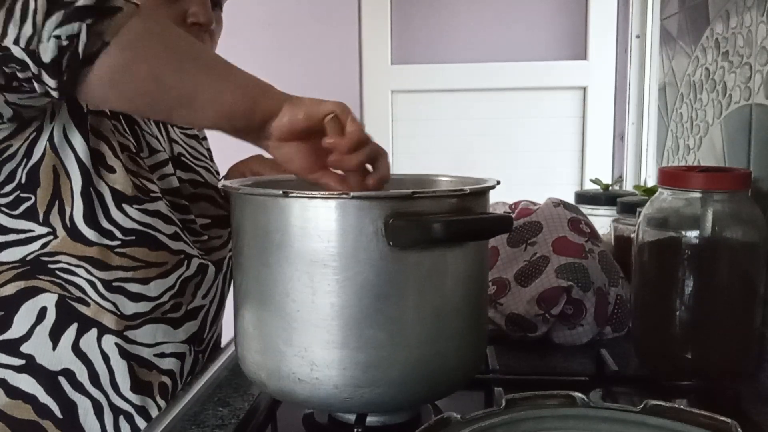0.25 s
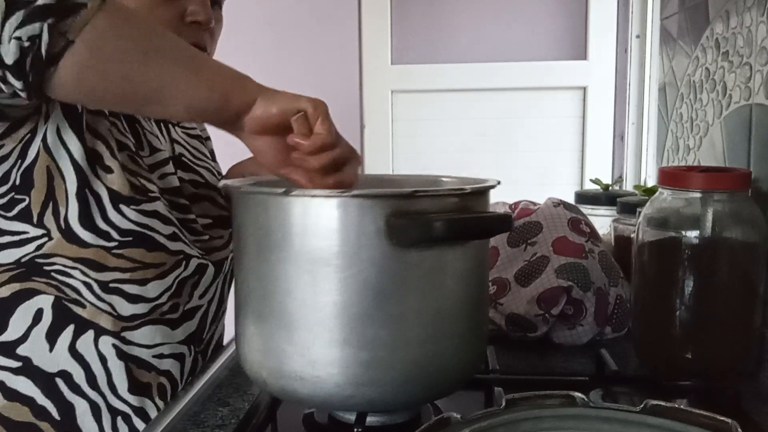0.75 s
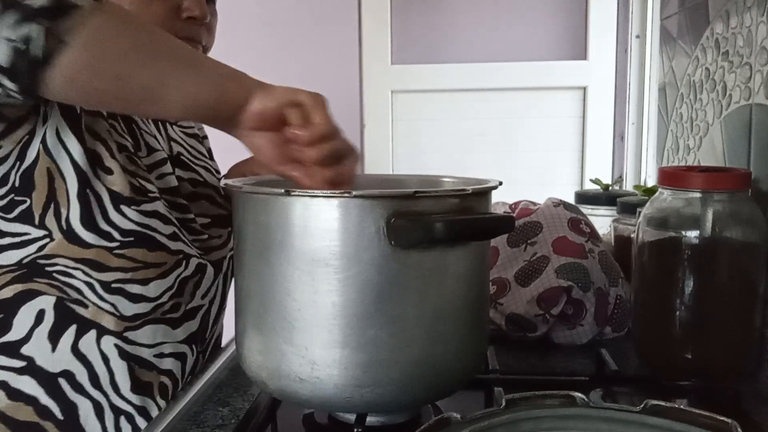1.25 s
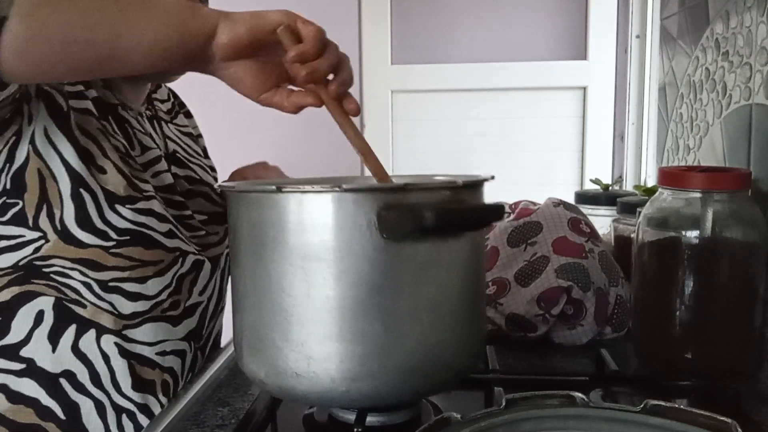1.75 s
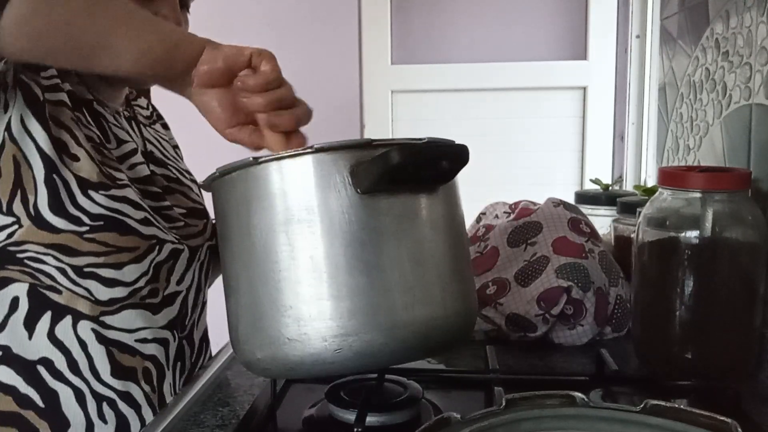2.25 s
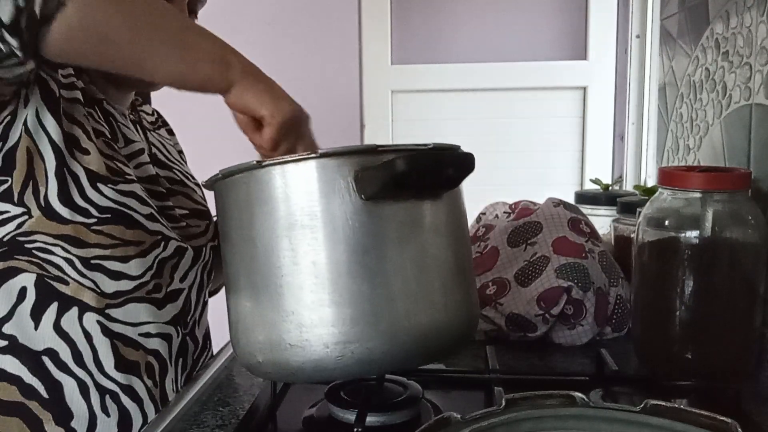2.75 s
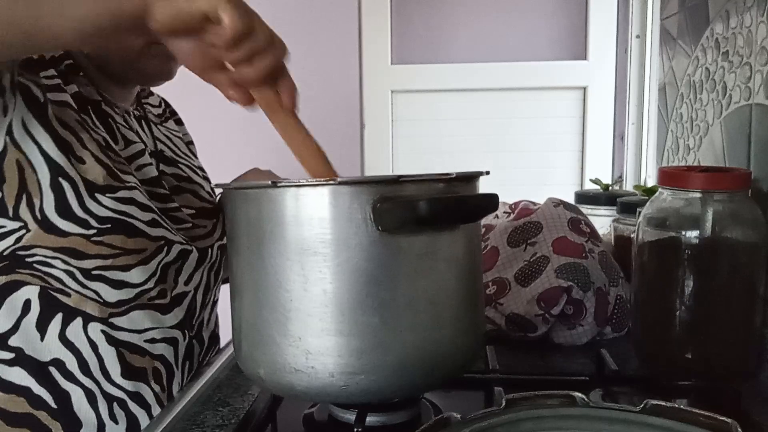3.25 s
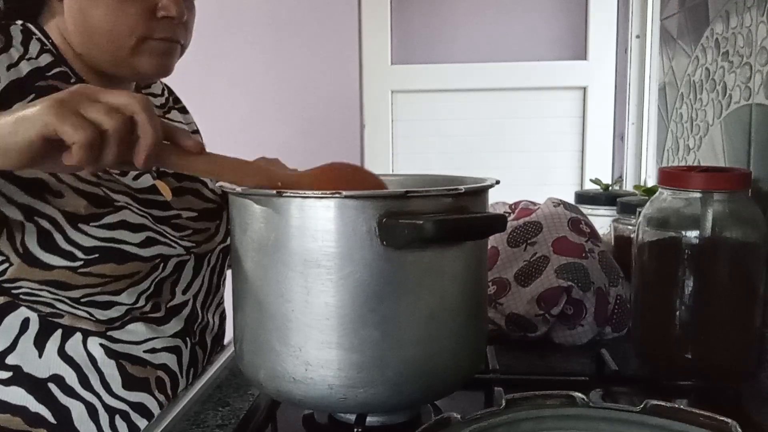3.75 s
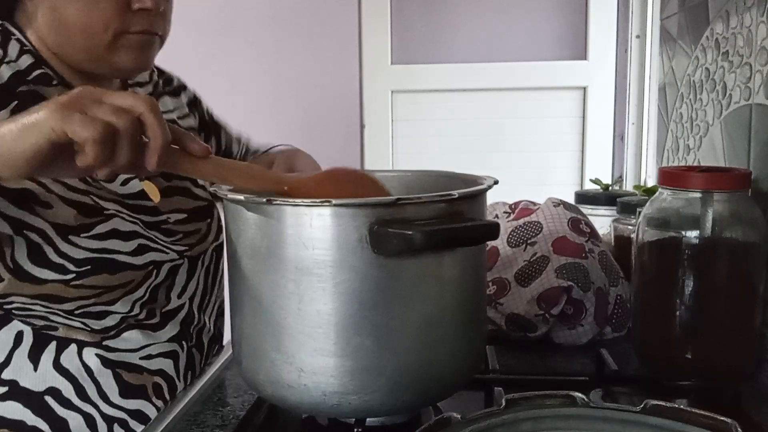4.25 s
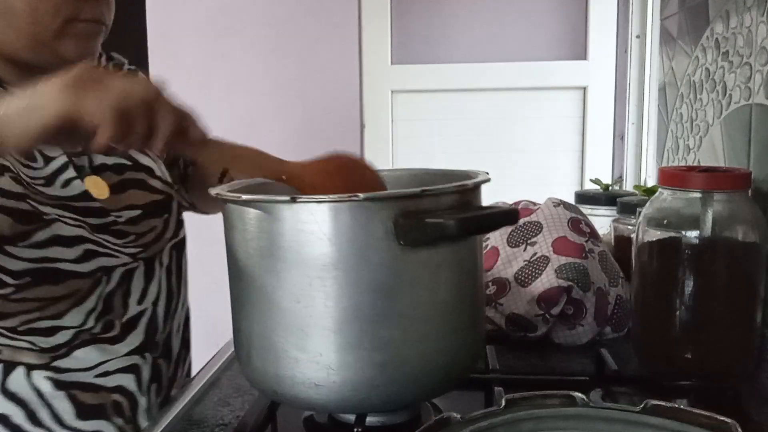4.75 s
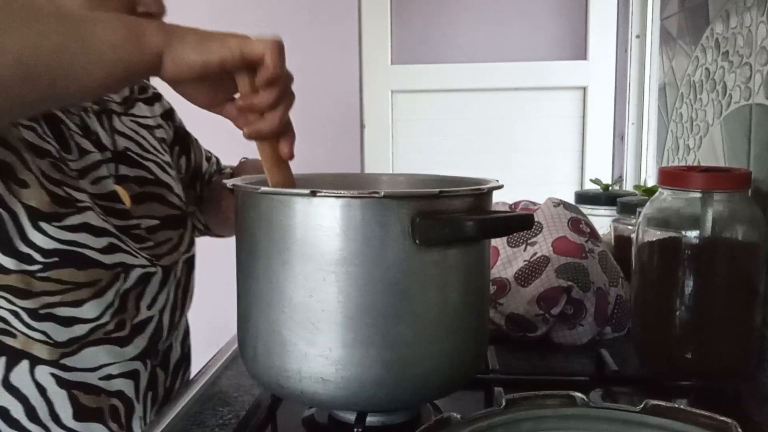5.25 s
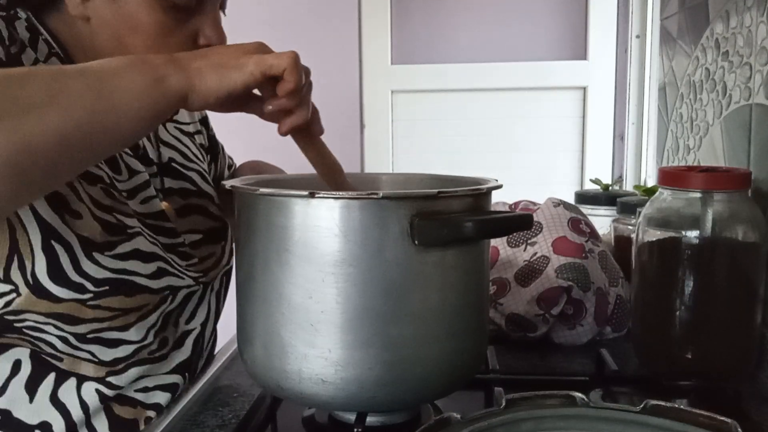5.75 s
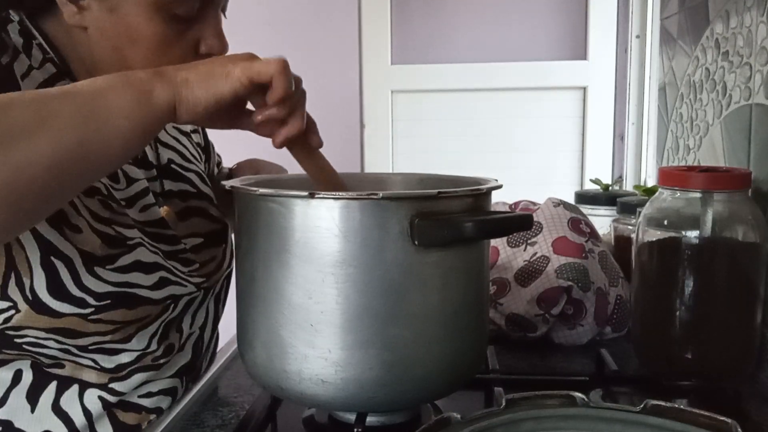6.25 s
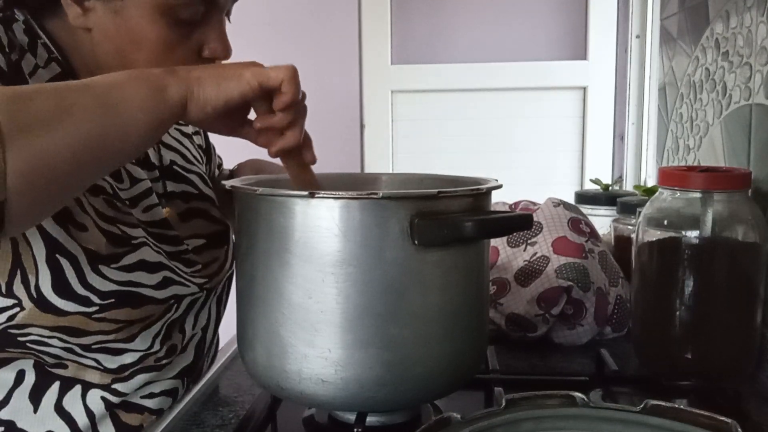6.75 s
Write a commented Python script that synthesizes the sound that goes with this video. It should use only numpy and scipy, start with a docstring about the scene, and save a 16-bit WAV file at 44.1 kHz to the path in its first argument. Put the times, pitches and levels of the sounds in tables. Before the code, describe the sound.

Close in a small, hard kitchen, a wooden spoon rubs through thick beans in an aluminium pot, with dull knocks and small clatters. Midway, three evenly spaced loud taps hit the rim, each ringing hollowly and clacking on the stove grate. Dull thumps follow, then sparser stirring fades to quiet. Sparrows chirp throughout with echoes, over soft outdoor wash and faint hiss.

```python
"""In a small hard kitchen, a wooden spoon stirs thick beans in an aluminium pot on a stove grate. Stirring is
lumpy noise through the tones of the pot's air and wall; knocks add clicks, clatter and a weak ring. Three taps
on the rim ring the pot's own tones, and each time it clacks on the grate. The room booms near 120 Hz under the
cook's movements (low filtered noise), with a few thin squeaks. Outside, sparrows chirp (falling, warbling sines
blurred by echoes) over far twitter, a few faint far notes near 2.3-2.8 kHz, and a soft wash of noise."""
import sys
import numpy as np
from scipy import signal
from scipy.fft import rfft, irfft, next_fast_len
from scipy.io import wavfile
from scipy.ndimage import uniform_filter1d, map_coordinates

SR = 44100
rng = np.random.default_rng(int(sys.argv[2]) if len(sys.argv) > 2 else 0)


def dump_mix(stems):
    """Bounce the given channels to the path in sys.argv[1] as a 16-bit WAV at rate SR."""
    frames = np.atleast_2d(stems).T  # one column per channel
    limited = np.clip(frames, -1, 1)  # hard clip at full scale
    pcm = np.round(limited * 32767).astype(np.int16)
    wavfile.write(sys.argv[1], SR, pcm)


N = 309141  # length in samples

# Still kitchen and microphone hiss. Each row: frequency in Hz, relative level in dB per Hz.
AIR_COLOUR = [(150, -18), (220, -3.5), (310, 7.5), (430, -5.5), (800, -6.5), (1500, -12), (6000, -41),
              (8000, -27), (13000, -30), (15300, -21.5)]
# Far outdoor wash. Each row: frequency in Hz, relative level in dB per Hz.
WASH_COLOUR = [(1200, -7), (2500, -0.5), (3500, -1.5), (6500, -11.5), (8000, -33.5)]
# A faint whine. Each row: frequency in Hz, middle level in dB.
WHINE_TONES = [(10153, -95.5)]
# Far small birds. Each row: from in seconds, to in seconds, middle level in dB.
TWITTER_SPELLS = [(1.93, 2.75, -74), (6.13, 6.9, -72)]
# Sparrow chirps. Each row: start in seconds, length in seconds, first pitch in Hz, level in dB.
SPARROW_CHIRPS = [(.13, .14, 4630, -55), (.27, .084, 4160, -52), (.54, .053, 4500, -58.5),
                  (.95, .11, 4650, -51), (1.16, .07, 4300, -56), (1.385, .089, 4740, -52.5),
                  (2.13, .11, 4530, -66), (2.39, .081, 4400, -50), (3.12, .078, 4000, -61),
                  (3.64, .15, 4390, -55), (4.4, .058, 4460, -50.5), (5.225, .14, 4340, -52),
                  (6.3, .096, 4260, -54.5), (6.7, .12, 4300, -51.5)]
# The way in from outdoors. Each row: frequency in Hz, width in Hz, level in dB.
WINDOW_TONES = [(3300, 350, -3), (4000, 100, 3), (4430, 160, 0), (4850, 250, -4)]
# One clear falling note. Each row: start in seconds, length in seconds, first pitch in Hz, level in dB.
CLEAR_PEEP = [(6.09, .045, 6000, -76)]
# Thin rough squeaks, and (near 2.1-2.4 s, 2.3-2.8 kHz) a few faint far bird notes. # Each row: start in
# seconds, length in seconds, pitch in Hz, level in dB.
THIN_SQUEAKS = [(0.05, 0.14, 960, -64), (2.1, 0.062, 2825, -70), (2.28, .08, 2330, -70),
                (2.39, .06, 2330, -70), (5.261, 0.045, 1300, -57), (5.337, .14, 1490, -59),
                (5.425, .1, 1000, -66), (5.804, 0.19, 1283, -77)]
# The cook steps, leans and shifts the pot. Each row: start in seconds, time held in seconds, level in dB.
COOK_BUMPS = [(.67, .2, -51), (1.17, .25, -56), (1.55, .1, -61), (1.81, .06, -45), (2.38, .09, -55),
              (2.57, .05, -60), (3.2, .03, -54), (3.4, .28, -53), (4.3, .1, -45), (4.46, .025, -38),
              (4.555, .12, -39), (4.84, .06, -46), (4.94, .11, -41), (5.22, .2, -49), (5.58, .06, -59),
              (6.14, .05, -61), (6.6, .25, -66)]
# Heavy footfalls. Each row: start in seconds, relative level in dB.
FOOT_THUDS = [(0.673, -47), (1.829, -45.5), (3.594, -53.5), (4.577, -47)]
# Spoon strokes. Each row: start in seconds, time held in seconds, level in dB, tone of the pot's air in Hz.
SPOON_STROKES = [(0, .05, -60, 470), (.1, .1, -52, 460), (.25, .1, -57, 500), (.415, .22, -54, 480),
                 (.67, .09, -53, 470), (.845, .04, -49, 600), (.92, .06, -47, 430), (1.01, .06, -49, 620),
                 (1.26, .1, -59, 500), (1.51, .03, -60, 450), (1.8, .05, -56, 330), (2.44, .1, -54.5, 460),
                 (2.74, .11, -60, 480), (4.56, .12, -49, 330), (4.87, .1, -59, 330), (5.3, .03, -58, 330),
                 (5.41, .05, -62, 380)]
# Lighter contacts, damped by the food. Each row: start in seconds, level in dB, woody tone in Hz, then,
# against that level, pot body (1-2.5 kHz), clatter (2.5-7 kHz) and tick (over 9 kHz), all in dB.
SPOON_KNOCKS = [(.2, -38, 443, -10, -10.5, -43), (.221, -44, 390, -9, -6, -24),
                (.495, -41, 477, -17, -19, -36), (.728, -43, 1850, -9, -8, -27),
                (.839, -34, 800, -12, -7, -20), (.989, -39, 474, -28, -21, -36),
                (1.107, -43.5, 1830, -6, -9, -24), (1.271, -43, 780, -5, -13, -46),
                (1.34, -44, 1970, -9, -7, -18), (1.482, -48, 1810, -7, -11, -28),
                (1.509, -44.5, 430, -24, -2, -9), (1.79, -36, 380, -56, -60, -56),
                (2.875, -43, 1500, -7, -9, -9), (2.891, -45, 1460, -23, -5, -14),
                (3.021, -43, 1740, -20, -15, -30), (3.058, -55, 1680, -7.5, -11, -8),
                (3.228, -48, 980, -29, -20, -33), (3.582, -40, 400, -45, -44, -50),
                (3.69, -49, 800, -22, -40, -50), (4.465, -26, 305, -30, -39, -62),
                (4.547, -31, 720, -14, -28, -50), (4.848, -38, 710, -7, -27, -60),
                (5.292, -35, 434, -8, -21, -54), (5.768, -42, 690, -2, -33, -75)]
# The pot wall's own tones. Each row: frequency in Hz, relative level in dB,
# time to fall 60 dB in seconds (each blow scales it).
POT_TONES = [(277, -11, 1.6), (448, -6, .25), (502, -7, 0.38), (716, 0, .2), (755, -2.5, .5),
             (1000, -10, .3), (1448, 1, .65), (1655, -8, .4), (1942, -3, .6), (2350, -9, .4),
             (2546, -3, .55), (3170, -3, .35), (3790, -5, .35), (4200, -6, .3), (4920, 0, .27)]
# Fading of pot and kitchen. Each row: frequency in Hz, time to fall 60 dB in seconds (each blow scales it).
POT_DECAY = [(100, 0.84), (260, 0.9), (700, 0.55), (1840, 0.55), (4850, 0.47), (12800, 0.18)]
# Taps on the rim. Each row: start in seconds, blow level in dB, delay of the clack in seconds, clack level in dB.
RIM_TAPS = [(3.8408, -15.5, 0.0059, -22), (4.0269, -14.5, 0.0061, -22.5), (4.2136, -17.5, 0.0073, -24.5)]
# Soft wood on the rim. Each row: frequency in Hz, relative level in dB.
BLOW_COLOUR = [(90, -22), (300, 3), (800, -9.5), (1500, -26.5), (4000, -31), (12000, -52.5)]
# Metal on metal. Each row: frequency in Hz, relative level in dB.
CLACK_COLOUR = [(300, -13), (900, -7.5), (1500, -5.5), (2600, -2.5), (4000, -11), (6200, -14.5),
                (8700, -36), (15500, -43.5)]

AIR_DB, WASH_DB = -74, -71.5
BUMP_RISE_S, BUMP_FALL_DB_PER_S = .025, 170
ROOM_STILL_DB, TAP_BOOM_DB = -70, -27  # the room's low tones at rest; what a tap adds, against its blow
STROKE_RISE_S, STROKE_FALL_DB_PER_S = .035, 150
SPOON_HZ, SPOON_WIDTH_HZ = [1850, 3000, 5600], 90  # the wooden spoon's short tones
SHARP_T60_S, T60_S_PER_DB = .13, .0035  # a sharp contact dies fast; the weaker its tick, the longer it lasts
TOP_HZ = 15800


def amp(db):
    """Turns dB into a plain multiplier."""
    return 10 ** (np.asarray(db) / 20)


def unit(x):
    """Scales a sound to an average (rms) level of 1."""
    return x / np.sqrt(np.mean(x ** 2) + 1e-20)


def along(points, hz):
    """Reads a curve of (Hz, value) points on a log frequency axis."""
    f, v = np.transpose(points)
    return np.interp(np.log(hz + 1), np.log(f + 1), v)


def wobble(rate, size=N):
    """A smooth random curve with rate knots a second."""
    knots = rng.standard_normal(int(size * rate / SR) + 4)
    return map_coordinates(knots, [np.arange(size) * rate / SR])


def filtered(x, response):
    """Shapes a sound by a complex response over frequency."""
    m = next_fast_len(len(x) + 8192)
    return irfft(rfft(x, m) * response(np.fft.rfftfreq(m, 1 / SR)), m)[:len(x)]


def resonance(hz, width_hz):
    """Response of one damped tone: it lets through what lies near hz."""
    return lambda f: 1j * f * width_hz / (hz * hz - f * f + 1j * f * width_hz + 1e-9)


def add(track, s, sound):
    """Mixes a sound into the track from time s."""
    part = track[round(s * SR):][:len(sound)]
    part += sound[:len(part)]


def swell(sound, held, db, rise, fall_db_per_s):
    """The sound rises, holds at its level and dies away."""
    t = np.arange(len(sound)) / SR
    fall = amp(-fall_db_per_s * np.clip(t - rise - held, 0, None))
    shape = fall * np.clip(t / rise, 0, 1)
    return amp(db) * shape * sound * np.linalg.norm(shape) / np.linalg.norm(shape * sound)


def dying_noise(t60_of, colour_db_of, size):
    """Noise in which each frequency has its own level and dies at its own speed."""
    hz, t, z = signal.stft(rng.standard_normal(size), SR, nperseg=256)
    hz = hz[:, None]
    return signal.istft(z * amp(colour_db_of(hz) - 60 * t / t60_of(hz)), SR, nperseg=256)[1][:size]


def background():
    """Still air, the patchy wash from outdoors and a faint wavering whine."""
    air = amp(AIR_DB) * unit(filtered(rng.standard_normal(N), lambda f: amp(along(AIR_COLOUR, f))))
    z = signal.stft(rng.standard_normal(N), nperseg=512)[2]
    # smooth random patches over frequency, then over time
    field = uniform_filter1d(uniform_filter1d(rng.standard_normal(z.shape), 3, 0), 16, 1)
    patchy = signal.istft(z * amp(3.5 * unit(field)), nperseg=512)[1][:N]
    wash = amp(WASH_DB) * unit(filtered(patchy, lambda f: amp(along(WASH_COLOUR, f))))
    t = np.arange(N) / SR
    whine = sum(amp(db + 2.8 * wobble(7.5)) * np.sin(2 * np.pi * hz * t) for hz, db in WHINE_TONES)
    return air + wash + whine


def whistles(rows, fall, warble_hz, depth_hz, echo_t60, direct_db):
    """Sines that can fall and warble, each with a direct sound and a new tail of echoes."""
    out = np.zeros(N)
    for s, length, first_hz, db in rows:
        u = np.linspace(0, 1, round(length * SR))
        hz = first_hz * (1 - fall * u) + depth_hz * np.sin(2 * np.pi * warble_hz * length * u)
        call = np.sin(np.pi * u) ** .5 * np.sin(2 * np.pi * np.cumsum(hz) / SR)
        tail = rng.standard_normal(SR // 2) * amp(-60 * np.arange(SR // 2) / SR / echo_t60)
        tail = tail / np.linalg.norm(tail)
        tail[0] = amp(direct_db)
        add(out, s, amp(db) * signal.fftconvolve(call, tail))
    return out


def twitter(notes_per_s=22):
    """Far small birds: short faint notes at chance times and pitches."""
    rows = []
    for start, end, db in TWITTER_SPELLS:
        u = rng.random((round(notes_per_s * (end - start)), 4))
        for a, b, c, d in u:
            rows.append((start + a * (end - start), .025 + b / 30, 2250 + 900 * c, db + 8 * d - 4))
    return whistles(rows, fall=.04, warble_hz=70, depth_hz=110, echo_t60=.2, direct_db=-3)


def sparrows():
    """Falling, warbling chirps, mostly echoes, coloured by the way in from outdoors."""
    chirps = whistles(SPARROW_CHIRPS, fall=0.19, warble_hz=54.3, depth_hz=380, echo_t60=0.44, direct_db=-10.5)
    return filtered(chirps, lambda f: 0.19 + sum(amp(db) * resonance(hz, width)(f)
                                                 for hz, width, db in WINDOW_TONES))


def peep():
    """One clear note that falls without a warble."""
    return whistles(CLEAR_PEEP, fall=.21, warble_hz=0, depth_hz=0, echo_t60=.2, direct_db=0)


def squeaks():
    """Thin notes at a level pitch, made rough by a fast warble: squeaks, and a few far bird notes."""
    return whistles(THIN_SQUEAKS, fall=0, warble_hz=37, depth_hz=25, echo_t60=.3, direct_db=1)


def room_modes(f):
    """The room's low tones: a strong group near 120 Hz and a weak one at 310 Hz."""
    low = (resonance(115, 30)(f) - 0.6 * resonance(152, 35)(f)) * resonance(125, 120)(f)
    return low + amp(-20) * resonance(310, 70)(f) ** 2


def rumble(size):
    """Noise through the room's low tones, with an uneven level."""
    return amp(2.6 * wobble(14, size)) * filtered(rng.standard_normal(size), room_modes)


def boom():
    """Steps, leaning and taps shake the room's low tones; footfalls and a faint steady rumble lie below them."""
    room, t = amp(ROOM_STILL_DB) * unit(rumble(N)), np.arange(SR // 2) / SR
    tap_bumps = [(s, .05, db + TAP_BOOM_DB) for s, db, *_ in RIM_TAPS]
    for s, held, db in COOK_BUMPS + tap_bumps:
        add(room, s, swell(rumble(len(t)), held, db, BUMP_RISE_S, BUMP_FALL_DB_PER_S))
    for s, db in FOOT_THUDS:
        shake = unit(filtered(rng.standard_normal(len(t)), lambda f: resonance(62, 50)(f) ** 2))
        add(room, s, amp(db - 1 - 60 * t / 1.2) * (1 - np.exp(-t / 0.0093)) * shake)
    deep = unit(filtered(rng.standard_normal(N), lambda f: resonance(65, 50)(f) ** 2))
    return room + amp(-76.5) * deep


def drag(lumpy_db=3, wall_db=-10):
    """The spoon pushes through beans: lumpy rubbing heard through the pot's air cavity and its wall.
    Harder, shallower strokes reach the higher cavity tone and the wall more."""
    out, size = np.zeros(N), SR // 2
    for s, held, db, cavity_hz in SPOON_STROKES:
        lumps = wobble(30, size) + wobble(110, size) / 2
        rub = rng.standard_normal(size) * amp(lumpy_db * lumps)
        tone = lambda hz, width: unit(filtered(rub, lambda f: resonance(hz, width)(f) ** 2))
        drift = wobble(6.4, size) - np.linspace(-1, 3, size)  # the higher tone gains as the spoon rises
        effort = np.clip((db + 57) / 9, 0, 1) * cavity_hz / 550
        low = amp(2 * drift) * tone(cavity_hz, 125)
        high = amp(-2 * drift) * (0.45 + 0.4 * effort) * tone(1.35 * cavity_hz, 200)
        wall = amp(wall_db) * (2 * tone(900, 400) + tone(1350, 500))
        stroke = low + high + effort ** 2 * wall
        add(out, s, swell(stroke, held, db, STROKE_RISE_S, STROKE_FALL_DB_PER_S))
    return out


def strike(colour, slow, ring_db, clatter_db, size=SR * 3 // 4):
    """The pot's tones, each a beating pair at a new strength, over a dense clatter, both in the blow's colour."""
    t = np.arange(size) / SR
    ring = 0
    for hz, db, t60 in POT_TONES:
        split = rng.uniform(.003, .01)  # gap within the pair, as a share of its pitch
        lower = np.sin(2 * np.pi * hz * (1 - split / 2) * t)
        upper = np.sin(2 * np.pi * hz * (1 + split / 2) * t)
        luck_db = rng.normal(0, 2)
        # higher tones flutter more
        flutter_db = min(hz / 500, 4) * np.interp(t, t[::700], rng.standard_normal(len(t[::700])))
        level_db = along(colour, hz) + db + ring_db + luck_db + flutter_db
        ring = ring + amp(level_db - 60 * t / (t60 * slow)) * (lower + .6 * upper)
    clatter = dying_noise(lambda hz: slow * along(POT_DECAY, hz), lambda hz: along(colour, hz) + clatter_db, size)
    return ring + clatter


def knocks():
    """Close clicks sound one woody tone, a ragged clatter with weak pot ring, and a tick."""
    out, t = np.zeros(N), np.arange(SR * 2 // 5) / SR
    comb = np.arange(300, 16000, 350)
    onset = 1 - np.exp(-t / .002)
    for s, db, tone_hz, body_db, clatter_db, tick_db in SPOON_KNOCKS:
        t60 = np.clip(SHARP_T60_S - T60_S_PER_DB * tick_db, .05, .6)
        grip = np.append(1, rng.standard_normal(len(t[220::220])))  # the first touch is firm, the rest uneven
        clicks = amp(4 * np.interp(t, t[::220], grip))
        fading = clicks * amp(-60 * t / t60) * onset
        wood = unit(filtered(rng.standard_normal(len(t)), resonance(tone_hz, 0.24 * tone_hz))) * fading
        wood = filtered(wood, lambda f: resonance(tone_hz, tone_hz)(f) ** 2)
        colour = [(500, body_db - 7), (1500, body_db - 2), (3000, clatter_db), (6000, clatter_db - 0.5),
                  (8500, tick_db - 4), (15500, tick_db + 6)]
        spots = rng.normal(0, 4, len(comb))
        ragged = np.transpose([comb, along(colour, comb) + spots])  # each spot of contact has its own resonances
        clatter = strike(ragged, slow=t60 / 0.36, ring_db=-10, clatter_db=4.5, size=len(t))
        spoon_db = 3 + rng.normal(0, 4, len(SPOON_HZ))
        clatter = filtered(clatter, lambda f: 1 + sum(amp(g) * resonance(hz, SPOON_WIDTH_HZ)(f)
                                                      for hz, g in zip(SPOON_HZ, spoon_db)))
        contact = amp(-10) * wood + clatter * clicks ** .6 * onset
        add(out, s, amp(db) * contact * (1 - (t / t[-1]) ** 4))  # the last factor closes the end softly
    return out


def taps():
    """A hollow knock of the spoon, then the pot drops back on the grate with a bright clack."""
    out, t = np.zeros(N), np.arange(SR * 3 // 4) / SR
    for s, blow_db, delay, clack_db in RIM_TAPS:
        spoon = amp(-60 * t / 0.028) * np.sin(2 * np.pi * 460 * t - 0.9 * np.exp(-t / 0.003))
        blow = spoon + strike(BLOW_COLOUR, slow=0.78, ring_db=-9, clatter_db=1.5)
        add(out, s, amp(blow_db) * blow * (1 - np.exp(-t / 0.0014)))
        first = 1 + 4.8 * np.exp(-t / 0.0056)  # the direct sound stands over the room's tail
        clack = strike(CLACK_COLOUR, slow=.82, ring_db=-12, clatter_db=-.5) * first
        add(out, s + delay, amp(clack_db) * clack * (1 - np.exp(-t / 0.003)))
    return out


def scene():
    """Adds up all the sounds, from the background to the taps."""
    outdoors = twitter() + sparrows() + peep()
    kitchen = squeaks() + boom() + drag() + knocks() + taps()
    return (background() + outdoors + kitchen)[None]


def record(dry):
    """The microphone loses the deepest bass; nothing above TOP_HZ is kept."""
    return filtered(dry[0], lambda f: (1j * f / (45 + 1j * f)) ** 2 * (f < TOP_HZ))[None]


dry = scene()
out = record(dry)
dump_mix(out)
```